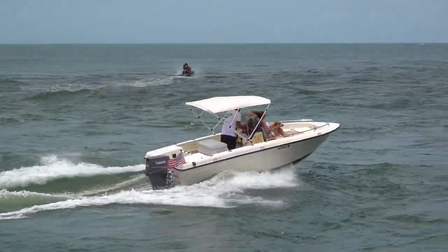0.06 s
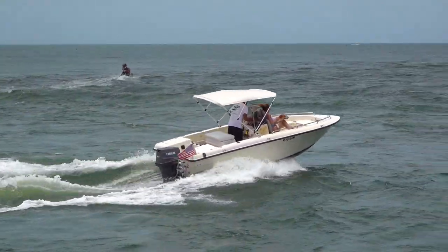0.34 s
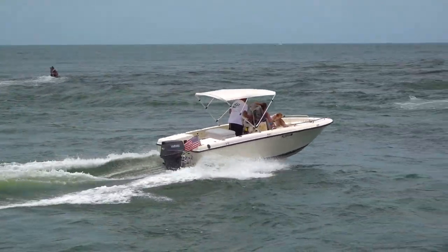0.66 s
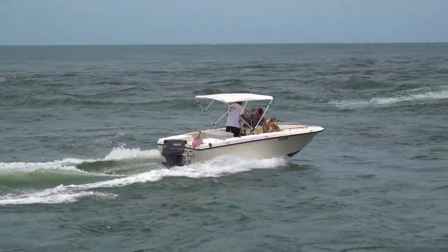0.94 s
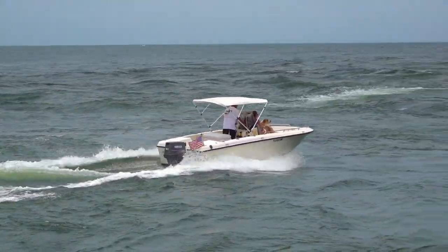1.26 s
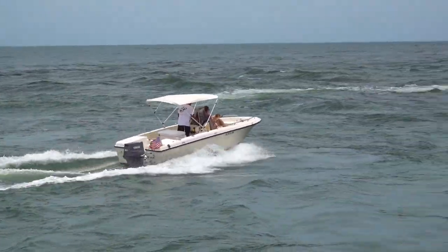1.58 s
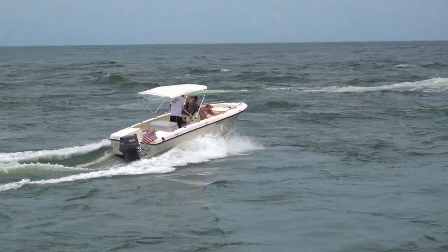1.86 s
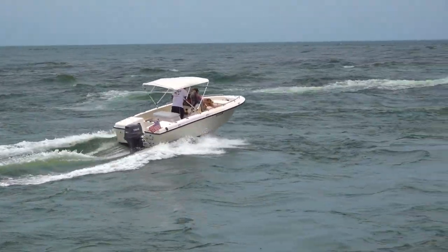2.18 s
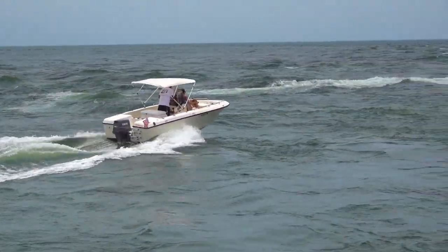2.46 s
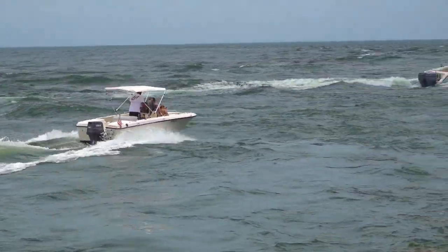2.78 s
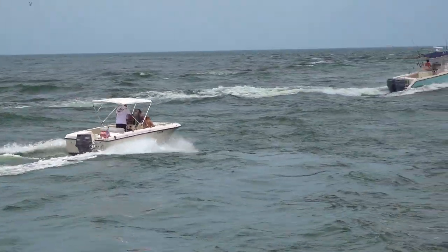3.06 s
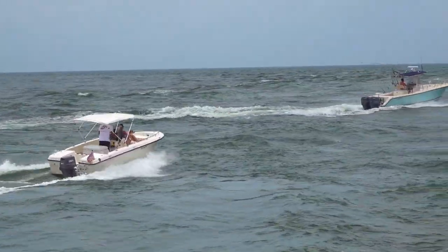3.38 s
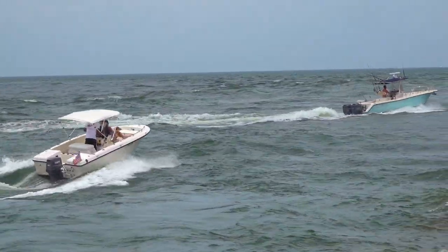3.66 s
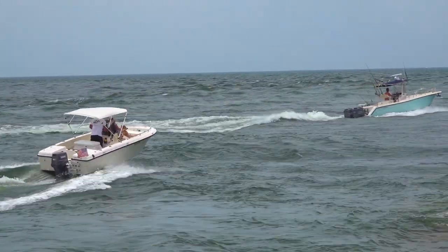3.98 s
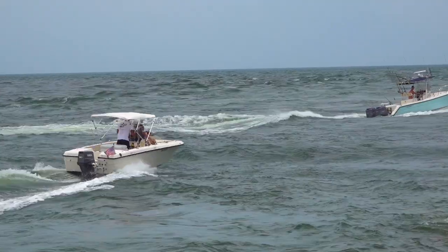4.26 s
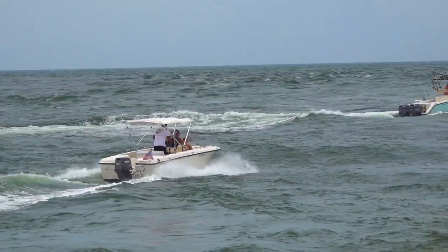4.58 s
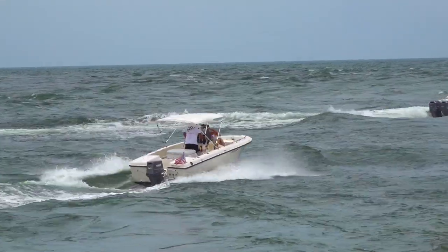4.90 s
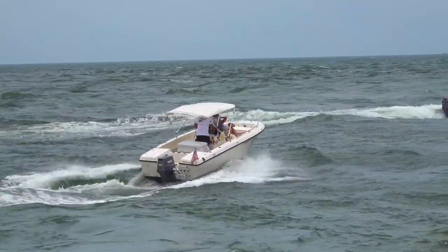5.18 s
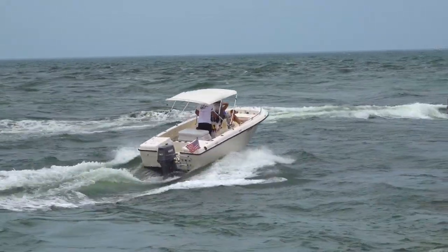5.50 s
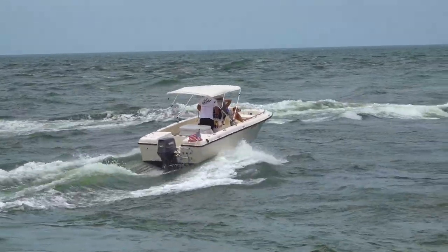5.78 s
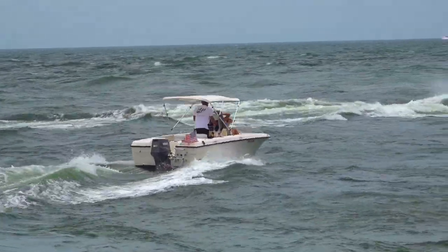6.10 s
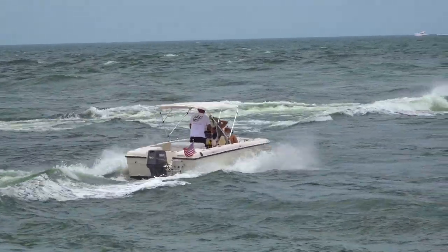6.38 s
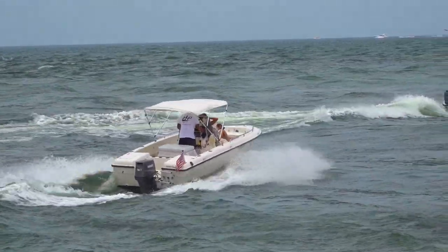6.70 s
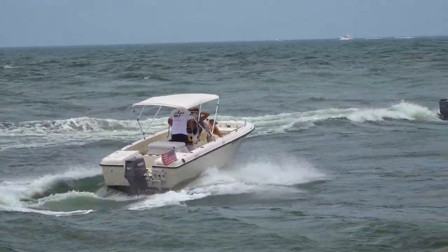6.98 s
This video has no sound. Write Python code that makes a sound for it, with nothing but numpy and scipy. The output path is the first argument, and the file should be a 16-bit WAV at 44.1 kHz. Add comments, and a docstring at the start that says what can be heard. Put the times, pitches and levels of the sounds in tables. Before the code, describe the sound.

Low wind buffets the microphone on open water, then gradually eases. Through it comes the steady, slightly wavering drone of an outboard motor, with a bubbling wake and hissing spray that swell as the boat hits waves. The boat recedes a little and its pitch slips slightly lower. Another boat hums faintly in the distance, and one small, close water slap comes near the end.

```python
"""On choppy open water, a small outboard boat runs away from us, its motor firing three times a turn
and sagging and recovering over the waves. Its wake churns, bubbles and fizzes, and brief whooshes
come and go. Close by, wavelets spit and water slaps once; farther off, a second boat drones.
Wind eddies thump the microphone, hardest in the first second and a half."""
import sys
import numpy as np
from scipy import signal
from scipy.fft import rfft, irfft
from scipy.io import wavfile
from scipy.ndimage import uniform_filter1d

SR = 44100
rng = np.random.default_rng(int(sys.argv[2]) if len(sys.argv) > 2 else 0)


def file_out(sig):
    """Save sig as 16-bit WAV at sys.argv[1]."""
    # one column per channel
    cols = np.atleast_2d(sig).T
    # limit, then scale
    lim = np.clip(cols, -1, 1)
    pcm = np.round(lim * 32767).astype(np.int16)
    wavfile.write(sys.argv[1], SR, pcm)


N = 314874

# crankshaft speed, sagging as the hull climbs a wave: (time [s], speed [turns/s])
SHAFT_SPEED = [(0.0, 47.8), (0.3, 46.8), (0.89, 46.7), (1.19, 48.0), (1.5, 48.1), (1.78, 47.6),
               (2.08, 46.9), (2.38, 47.2), (2.68, 46.7), (2.97, 46.8), (3.27, 47.5), (3.57, 47.1),
               (3.87, 45.7), (4.17, 45.0), (4.46, 44.7), (4.76, 45.3), (5.35, 45.7), (5.65, 45.0),
               (5.95, 44.0), (6.25, 44.4), (6.54, 44.9), (6.84, 45.0), (7.14, 44.7)]
# the exhaust note swells each time the outlet clears the water: (time [s], level [dB])
EXHAUST_LEVEL = [(0, -26), (.4, -31), (.88, -31.5), (1.05, -42), (1.35, -30), (1.75, -41.5), (2.0, -34),
                 (2.25, -43), (2.55, -30), (2.8, -38), (3.1, -40), (3.55, -37), (3.95, -42), (4.22, -31),
                 (4.47, -34.5), (4.65, -29), (4.86, -36), (5.2, -34), (5.75, -36.5), (6.3, -38),
                 (7.1, -35.5)]
# engine tone balance: shaft harmonic -> (side-on [dB], stern-on [dB], boost at full stern lift [dB])
HARMONICS = {5: (-37.5, -44.5, 1.5), 6: (-41.5, -45, 4), 7: (-58, -57, 0), 8: (-56, -48, 4),
             9: (-44.5, -54, 1), 10: (-50, -53.5, 3), 11: (-54, -53, 5), 12: (-48.5, -50, 5),
             13: (-53.5, -58, 4), 14: (-53.5, -57, 2), 15: (-59, -62, 1), 16: (-58, -60, 2),
             17: (-61, -59, 8), 18: (-59.5, -62.5, 4), 20: (-58, -64, 0), 21: (-68, -68, 9),
             24: (-61, -69, 0), 28: (-63, -60, 0)}
# waves lift the stern and motor clear of the water: (time [s], height [0-1], width [s])
STERN_LIFTS = [(.05, 0.95, 0.3), (.75, 0.55, 0.21), (1.55, 0.2, 0.33), (2.55, 0.5, 0.22),
               (4.25, 0.55, 0.54), (5.0, 0.22, 0.46), (6.2, 0.9, 0.098)]
# reflections off the water cancel or reinforce a tone: shaft harmonic -> (time [s], gain [dB], width [s])
REFLECTIONS = {5: [(.48, -11, 0.067), (1.72, -5.5, 0.15), (2.3, 2.5, 0.17), (3.38, -7, 0.13),
               (4.2, 6, .22)], 6: [(.52, -16, 0.051), (2.07, -20, 0.12), (2.65, 1.5, 0.18),
               (3.45, -8, 0.065), (3.94, -8, 0.076), (5.55, 0, 0.23)], 8: [(.48, 11, 0.19),
               (6.45, 4.5, 0.85)], 10: [(.03, 7.5, 0.13), (.55, -5, 0.17), (1.55, 5, 0.14),
               (2.1, -14, 0.12)], 12: [(.25, 3.5, 0.15), (1.0, -6, 0.24), (1.6, 0, .12), (2.15, 4.5, 0.18),
               (4.1, -1.5, .35)]}
# crests screen the harmonics and wake as the boat sinks into a trough: (time [s], cut [dB], width [s])
TROUGHS = [(1.75, -1.5, 0.22), (3.46, 3.5, 0.049), (4.85, 1, 0.3), (7.1, 2, 0.11)]
# the swinging stern beams the cowling's whine at us: (time [s], level [dB], width [s])
COWLING_BEAMS = [(1.2, -48, 0.12), (2.15, -52.5, 0.26), (4.12, -47, 0.28), (4.68, -53.5, 0.12),
                 (5.88, -51.5, 0.19)]

# water layers: name -> (starting level [dB], loss per distance doubling [dB], boost at full plunge [dB])
WATER_MIX = {"wake": (-30, 3.26, 0.59), "wash": (-41.5, 4.34, 4.1), "spray": (-54, 4, 1.6),
             "mist": (-66, 10, 1.9)}
# the bow plunges and throws water aside: (time [s], depth [0-1], width [s])
PLUNGES = [(.68, 0.7, 0.11), (1.17, 0.97, 0.15), (1.58, 1, 0.14), (1.94, 0.7, 0.18), (2.38, 0.16, 0.083),
           (2.74, 0.35, 0.071), (3.27, 0.64, 0.14), (3.85, 0.6, 0.21), (4.45, 0.14, 0.14),
           (5.5, 0.55, 0.11), (5.75, 0.5, 0.17), (6.92, 0.58, 0.18)]
# EQ of the water layers, dark to bright: (frequency [Hz], gain [dB])
WAKE_EQ = [(35, -25), (65, 9), (100, 11), (140, 5.5), (190, 6), (250, 0), (320, -2), (420, -5.5),
           (600, -10.5), (850, -13.5), (1400, -29.5)]
WASH_EQ = [(450, -3), (800, -3), (1250, 0), (1700, -3), (2200, -7), (3000, -18), (4500, -32)]
SPRAY_EQ = [(1700, -7), (2600, -1.5), (3200, -3.5), (4000, -10.5), (5200, -15.5), (7000, -23.5),
            (10000, -27.5)]
MIST_EQ = [(4000, -7.5), (6500, -0.5), (8500, -1.5), (12500, -4), (15500, -12)]
# brief swells of band noise: (time [s], level [dB], width [s], band centre [Hz])
WHOOSHES = [(0.2, -42.5, 0.15, 570), (1.346, -32.5, 0.12, 163), (2.66, -33.5, .09, 226),
            (2.6, -41.5, 0.25, 770), (4.49, -39, 0.098, 473), (6.153, -35, 0.017, 380),
            (6.334, -45, 0.092, 286), (6.797, -42, 0.42, 184), (1.156, -47, 0.053, 1630),
            (1.88, -50, 0.13, 1600), (5.02, -39, 0.091, 208), (6.303, -38, .14, 180)]

# a close slap and its small after-splash: (time [s], level [dB], decay [s])
SLAPS = [(5.899, -36, 0.033), (6.04, -44, .015)]
# nearby crests spit spray: (start [s], level [dB], hold [s])
SPITS = [(.03, -57, .08), (.12, -56, 0.044), (.18, -53, 0.064), (.38, -53.5, 0.027), (.58, -62, .02),
         (.697, -56, 0.027), (.745, -53, 0.031), (.929, -51, .006), (.953, -55, .07), (1.03, -54, 0.079),
         (1.405, -54, .01), (2.25, -65, 0.17), (2.83, -60, .035), (3.49, -57, 0.054), (5.22, -60, 0.05),
         (5.893, -60, .035), (6.75, -61, 0.42)]
# thrown spray patters back down: (time [s], level [dB], width [s])
SHOWERS = [(1.54, -50, 0.019), (2.28, -62, 0.027), (2.38, -54.5, 0.29), (3.82, -56, .03)]
# EQ of those three splashes: (frequency [Hz], gain [dB])
SLAP_EQ = [(450, 3), (850, 5), (1250, 12), (2200, 4), (3500, -10), (7000, -23), (14000, -27)]
SPIT_EQ = [(2500, 8.5), (4000, -1.5), (7000, -9), (12000, -17.5), (15500, -24)]
SHOWER_EQ = [(2400, 9), (3600, 1), (4600, -6), (6500, -16)]
# single drops, and the ringing hits and low body of the close slap near 5.9 s: (time [s], level [dB], pitch
# [Hz], time to fall 60 dB [s])
DROPS = [(1.048, -36, 10000, .0007), (3.682, -39, 12300, 0.001), (4.414, -43, 10500, .0007),
         (4.534, -46, 12500, .0008), (4.862, -40, 10400, .0008), (5.911, -27, 1250, 0.01),
         (5.918, -26, 583, 0.011), (5.931, -34, 1960, 0.0083), (6.007, -28, 1940, 0.021),
         (6.008, -48, 12000, .0007), (6.224, -34, 895, 0.04), (7.031, -43, 11000, .0008)]

# the far boat's note: (time [s], firing rate [Hz])
FAR_BOAT_PITCH = [(3.15, 149.5), (3.93, 146.1), (4.38, 130.3), (5.67, 142.9), (5.74, 136.1), (6.25, 137.6),
                  (6.49, 126.2), (7.0, 124.3)]
# crests lift it into the clear: (time [s], level [dB], width [s])
FAR_BOAT_RISES = [(1.3, -34.5, 0.1), (1.9, -35.5, 0.13), (3.25, -33.5, 0.24), (3.93, -32, 0.26),
                  (6.38, -31.5, .19), (6.98, -32.5, 0.18)]

# gusts on top of the breeze: (time [s], level [dB], width [s])
GUSTS = [(.62, -24, 0.42), (1.18, -27, 0.11), (2.42, -28, 0.068), (2.9, -29, 0.14), (4.05, -32.5, 0.2),
         (4.72, -38, 0.12), (5.65, -40, 0.042), (6.2, -45, .05), (6.55, -39, 0.12), (6.85, -27.5, 0.043)]
# the breeze drops briefly: (time [s], cut [dB], width [s])
CALMS = [(1.52, 7, 0.11), (5.42, 4, 0.064), (5.92, 6, 0.094)]
# strong gusts heave the air slowly: (time [s], level [dB], width [s])
HEAVES = [(.15, -18, 0.18), (.6, -17.5, 0.06), (4.05, -28, 0.31)]
# the strongest eddies hit the microphone: (time [s], level [dB], pitch [Hz])
EDDIES = [(0.056, -8.5, 39.9), (.108, -11.5, 27), (0.182, -5.5, 49.4), (0.22, -7.5, 27),
          (0.313, -8.5, 38.4), (0.364, -5.5, 37.7), (0.404, -10, 52), (0.457, -5, 33), (.52, -6.5, 34),
          (0.56, -2.5, 49.6), (0.672, -4.5, 37.5), (0.728, -2, 51), (0.79, -9, 68), (0.831, -7.5, 59),
          (0.875, -4.5, 62.5), (.933, -8.5, 66.7), (0.999, -5.5, 42), (1.037, -7.5, 51.6),
          (1.105, -13.5, 46), (1.163, -6.5, 53), (1.282, -5.5, 44.3), (1.346, -3.5, 64), (1.416, -6.5, 58),
          (1.498, -10.5, 65), (1.552, -9, 62.4), (1.985, -14.5, 50), (2.15, -11.5, 58.4), (2.37, -12, 34),
          (2.499, -12.5, 54), (2.751, -13, 44), (2.828, -14.5, 48.4), (3.098, -12.5, 46), (3.281, -11, 47),
          (3.69, -10, 35.7), (3.915, -15.5, 57), (3.998, -11.5, 38), (6.538, -15, 56)]
# EQ of the wind's rumble, its heave and the turbulence inside an eddy: (frequency [Hz], gain [dB])
RUMBLE_EQ = [(14, 9.5), (20, -1.5), (45, -1.5), (70, -2.5), (100, -7), (150, -13.5), (250, -38), (500, -30)]
HEAVE_EQ = [(14, 6), (24, 5), (40, -17), (60, -28)]
EDDY_EQ = [(70, 4), (130, 0.5), (250, -14.5), (500, -22.5)]

START_M, AWAY_M_PER_S = 27.2, 2.42
TURN_S, TURN_EASE_S = 3.83, 0.32  # the swing from side-on to stern-on: midpoint, time constant
HARMONICS_DB, LOSS_DB_PER_DOUBLING = -1.5, 1.9
COWLING_HZ, COWLING_WIDTH_HZ, COWLING_FLOOR_DB = 718, 44, -68
SLAP_ATTACK_S, SPIT_ATTACK_S, SPIT_RELEASE_S = 0.0058, .004, 0.017
FAR_BOAT_FLOOR_DB = -42.5  # screened by the waves
BREEZE_DB, BREEZE_FADE_DB_PER_S = -20.5, 2
EDDY_CYCLES, LULL_CYCLES = 0.39, 0.44  # widths of an eddy and of the lull around it
MIC_BEND, CUTOFF_HZ = .14, 15600


def outboard(crank):
    """Three firings a turn make the exhaust note; shaft harmonics shift as the boat lifts and turns."""
    exhaust_db, = in_time(EXHAUST_LEVEL)
    motor = from_db(exhaust_db) * tone(3 * crank, waver_db=.7, rough=0.12)
    astern = .5 + .5 * np.tanh((np.arange(N) / SR - TURN_S) / TURN_EASE_S)
    lift = bumps(STERN_LIFTS)
    fader_db = HARMONICS_DB - LOSS_DB_PER_DOUBLING * doublings() - bumps(TROUGHS)
    for order, (side_db, stern_db, lift_db) in HARMONICS.items():
        facing_db = side_db + astern * (stern_db - side_db)
        level_db = fader_db + facing_db + lift_db * lift + bumps(REFLECTIONS.get(order, []))
        rough = min(.019 * order, .35)  # uneven combustion blurs the high tones most
        motor += from_db(level_db) * tone(order * crank, waver_db=1.2, rough=rough)
    return motor + cowling(crank)


def cowling(crank):
    """Whichever shaft harmonic lies on the cowling's resonance sings out, over a band of intake roar."""
    turns_per_s, = in_time(SHAFT_SPEED)
    whine = 0
    for order in range(14, 18):
        detune = 2 * (order * turns_per_s - COWLING_HZ) / COWLING_WIDTH_HZ
        whine += tone(order * crank, waver_db=1.0, rough=.25) / np.sqrt(1 + detune ** 2)
    roar = rms_one(ring(rng.standard_normal(N), COWLING_HZ, t60=0.0099))
    return (from_db(COWLING_FLOOR_DB) + swells(COWLING_BEAMS)) * (whine + .6 * roar)


def wake_and_spray(crank):
    """Churning wake, bubbling wash and fizzing spray swell with each plunge and fade with distance."""
    plunge = bumps(PLUNGES)
    chop_db = 0.5 * drift(2.3)  # small waves make the layers waver together
    gain = {name: from_db(db - loss_db * doublings() + plunge_db * plunge + chop_db)
            for name, (db, loss_db, plunge_db) in WATER_MIX.items()}
    wake = gain["wake"] * from_db(-bumps(TROUGHS)) * noise(WAKE_EQ)
    froth = rng.standard_normal(N)
    froth += 0.18 * bubbles(per_s=1500, spread_db=4.0, cycles=14.0, low_hz=711, high_hz=3270)
    wash = gain["wash"] * from_db(0.35 * drift(24)) * equalise(froth, WASH_EQ)
    spray = gain["spray"] * equalise(grains(per_s=14000, spread_db=4.0), SPRAY_EQ)
    fizz = rng.standard_normal(N) + 0.29 * grains(per_s=700, spread_db=12.0)
    mist = gain["mist"] * equalise(fizz, MIST_EQ)
    throb = 1 + .04 * np.cos(crank) + .04 * np.cos(2 * crank)  # exhaust churns in time with the shaft
    flicker = from_db(0.92 * drift(26))
    return (wake + wash) * throb + (spray + mist) * flicker


def whooshes():
    """Brief swells of octave-wide noise, from low rumbles to brighter washes."""
    layer, white = np.zeros(N), rng.standard_normal(N)
    for s, db, width, hz in WHOOSHES:
        octave = signal.butter(2, [hz / np.sqrt(2), hz * np.sqrt(2)], "band", fs=SR, output="sos")
        layer += swells([(s, db, width)]) * rms_one(signal.sosfilt(octave, white))
    return layer


def slap():
    """A wavelet slaps close by: dense clicks with a fast attack and a short tail."""
    t = np.arange(N) / SR
    envelope = np.zeros(N)
    for s, db, decay in SLAPS:
        attack = np.clip(1 + (t - s) / SLAP_ATTACK_S, 0, 1)
        envelope += from_db(db) * attack * np.exp(-np.maximum(t - s, 0) / decay)
    return envelope * equalise(grains(per_s=6000, spread_db=3.0), SLAP_EQ)


def spits():
    """Crests spit bright bursts of spray that snap on, hold and die quickly."""
    t = np.arange(N) / SR
    envelope = np.zeros(N)
    for s, db, hold in SPITS:
        attack = np.clip((t - s) / SPIT_ATTACK_S, 0, 1)
        envelope += from_db(db) * attack * np.exp(-np.maximum(t - s - hold, 0) / SPIT_RELEASE_S)
    return envelope * equalise(grains(per_s=8000, spread_db=3.2), SPIT_EQ)


def droplets():
    """Thrown spray patters down in showers; single drops tick and plink, and the close slap rings with a few
    short hits."""
    patter = swells(SHOWERS) * equalise(grains(per_s=9000, spread_db=2.5), SHOWER_EQ)
    for s, db, hz, t60 in DROPS:
        patter += from_db(db) * ring(signal.unit_impulse(N, round(s * SR)), hz, t60)
    return patter


def far_boat():
    """A distant drone: only the firing note carries over the water."""
    firing_hz, = in_time(FAR_BOAT_PITCH)
    firing = 2 * np.pi * np.cumsum(firing_hz) / SR
    return (from_db(FAR_BOAT_FLOOR_DB) + swells(FAR_BOAT_RISES)) * tone(firing, waver_db=0, rough=0.12)


def wind():
    """A bed of turbulent rumble; each strong eddy ducks it and thumps with about one pressure swing."""
    t = np.arange(N) / SR
    strength = from_db(BREEZE_DB - BREEZE_FADE_DB_PER_S * t - bumps(CALMS)) + swells(GUSTS)
    rumble = noise(RUMBLE_EQ)
    rumble /= np.sqrt(uniform_filter1d(rumble ** 2, size=6000))  # levelled, so strength sets the dynamics
    heave = swells(HEAVES) * noise(HEAVE_EQ)
    ragged = 0.15 * noise(EDDY_EQ)
    thumps = np.zeros(N)
    for s, db, hz in EDDIES:
        cycles = (t - s) * hz
        strength *= 1 - bell(cycles, LULL_CYCLES)
        swing = np.cos(2 * np.pi * (cycles + .17 * rng.normal()))  # mostly a push, a bit early or late
        thumps += from_db(db) * bell(cycles, EDDY_CYCLES) * (swing + ragged)
    return strength * rumble + heave + thumps


def tone(phase, waver_db, rough):
    """An engine partial, wavering as waves shift its reflection and roughened by uneven combustion."""
    skirt = rough * (drift(24.0) + 1j * drift(21))
    level = from_db(waver_db * drift(1.46))
    carrier = np.exp(1j * (phase + 2 * np.pi * rng.random()))
    return np.sqrt(2) * level * np.real((1 + skirt) * carrier)


def bubbles(per_s, spread_db, cycles, low_hz, high_hz, count=20):
    """Each bubble rings for a few cycles at one of many pitches; rms 1."""
    births, pitch_index = grains(per_s, spread_db), rng.integers(0, count, N)
    pitches = np.geomspace(low_hz, high_hz, count)
    return rms_one(sum(ring(births * (pitch_index == k), hz, cycles / hz) for k, hz in enumerate(pitches)))


def grains(per_s, spread_db):
    """Random clicks of uneven size; rms 1."""
    sizes = from_db(spread_db * np.minimum(rng.exponential(1, N), 4))
    return rms_one(sizes * rng.choice([-1, 1], N) * (rng.random(N) < per_s / SR))


def ring(clicks, hz, t60):
    """A resonator: each click sets off a decaying sine."""
    r, w = from_db(-60 / (t60 * SR)), 2 * np.pi * hz / SR
    return signal.lfilter([0, np.sin(w)], [1, -2 * r * np.cos(w), r * r], clicks + 1e-18)


def noise(eq):
    """White noise through an EQ curve; rms 1."""
    return equalise(rng.standard_normal(N), eq)


def equalise(x, eq):
    """Apply an EQ curve that rolls off steeply beyond its ends; rms 1."""
    hz, gain_db = np.transpose(eq)
    f = np.maximum(np.arange(N // 2 + 1) * SR / N, 1)
    rolloff = np.minimum(f / hz[0], 1) ** 4 * np.minimum(hz[-1] / f, 1) ** 2
    curve = from_db(np.interp(np.log(f), np.log(hz), gain_db))
    return rms_one(irfft(rfft(x) * rolloff * curve, N))


def drift(hz):
    """Smooth random modulation; rms about 1."""
    r = np.exp(-80 * np.pi * hz / SR)  # one control point every 40 samples
    slow = signal.lfilter([1], [1, -2 * r, r * r], rng.standard_normal(N // 40 + 2002))[2000:]
    return np.interp(np.arange(N) / 40, np.arange(len(slow)), rms_one(slow))


def doublings():
    """How many times the boat's distance has doubled, at every sample."""
    return np.log2(1 + AWAY_M_PER_S * np.arange(N) / SR / START_M)


def swells(rows):
    """A gain envelope of bells, from rows (time [s], level [dB], width [s])."""
    return bumps([(s, from_db(db), width) for s, db, width in rows])


def bumps(rows):
    """A sum of bells, from rows (time [s], height, width [s])."""
    t = np.arange(N) / SR
    return sum(height * bell(t - s, width) for s, height, width in rows)


def bell(x, width):
    """A Gaussian rise and fall of height 1."""
    return np.exp(-.5 * (x / width) ** 2)


def in_time(rows):
    """Each column of an automation curve, at every sample."""
    s, *columns = np.transpose(rows)
    return [np.interp(np.arange(N) / SR, s, c) for c in columns]


def from_db(db):
    """Decibels to gain."""
    return 10 ** (np.asarray(db) / 20)


def rms_one(x):
    """Scale to rms 1."""
    return x / np.sqrt(np.mean(x ** 2) + 1e-20)


def scene():
    """The mono mix: both boats, the water and the wind."""
    turns_per_s, = in_time(SHAFT_SPEED)
    flutter = 0.035 * drift(3.25)  # the propeller bites unevenly in churned water
    crank = 2 * np.pi * np.cumsum(turns_per_s + flutter) / SR
    boats = outboard(crank) + far_boat()
    surroundings = wake_and_spray(crank) + whooshes() + slap() + spits() + droplets()
    return (boats + surroundings + wind())[None]


def record(dry):
    """The microphone sheds the lowest rumble and soft-clips big swings; the ends fade, the top is cut."""
    # the diaphragm yields less to a push than to a pull, so gusts make the hiss flutter
    bent = dry - MIC_BEND * dry * np.tanh(dry)
    thinned = signal.sosfilt(signal.butter(2, 12, "high", fs=SR, output="sos"), bent)
    clipped = thinned / (1 + thinned ** 10) ** (1 / 10)
    faded = clipped * signal.windows.tukey(N, .001)
    return signal.sosfilt(signal.ellip(10, .1, 80, CUTOFF_HZ, fs=SR, output="sos"), faded)


dry = scene()
out = record(dry)
file_out(out)
```